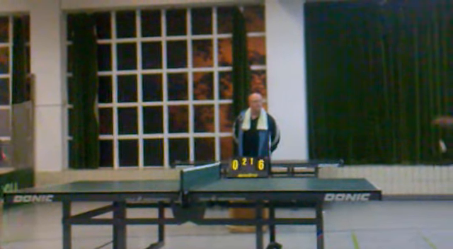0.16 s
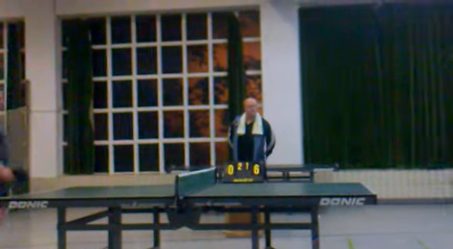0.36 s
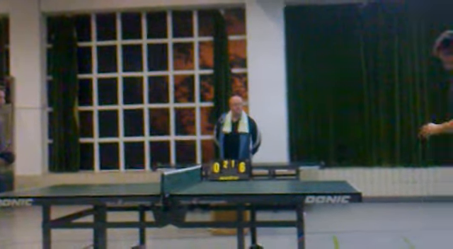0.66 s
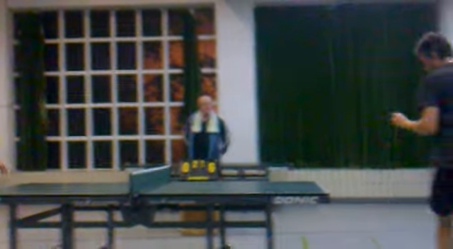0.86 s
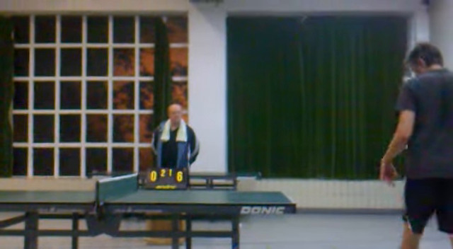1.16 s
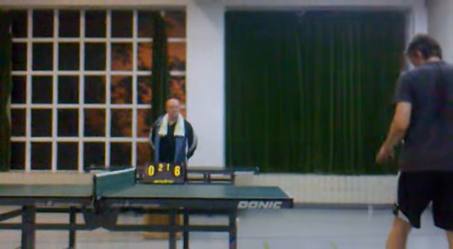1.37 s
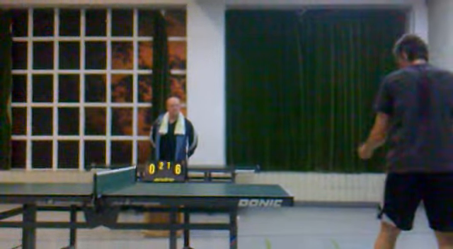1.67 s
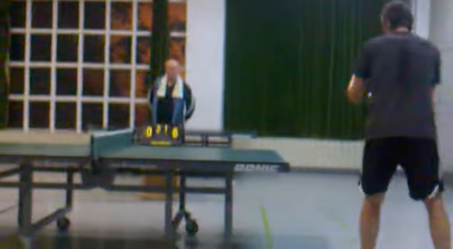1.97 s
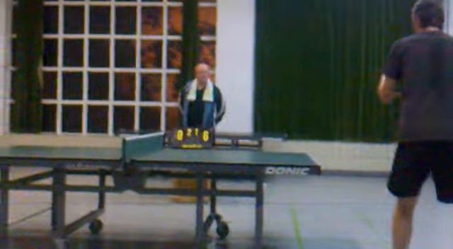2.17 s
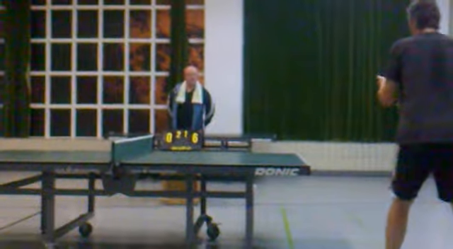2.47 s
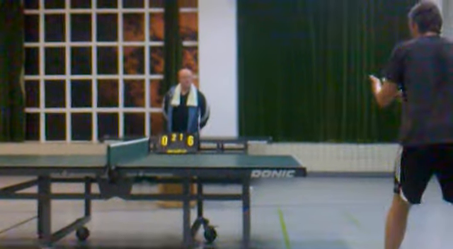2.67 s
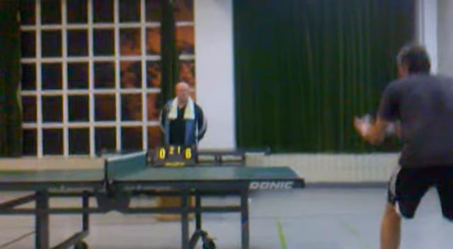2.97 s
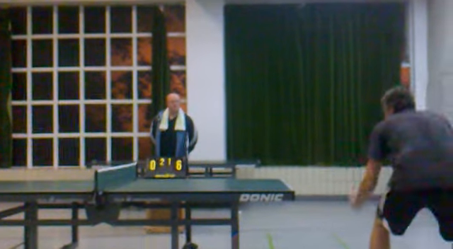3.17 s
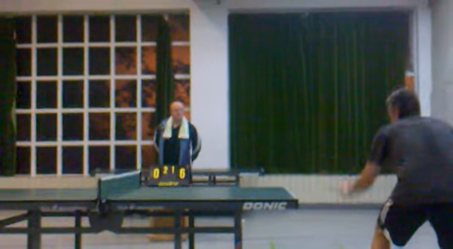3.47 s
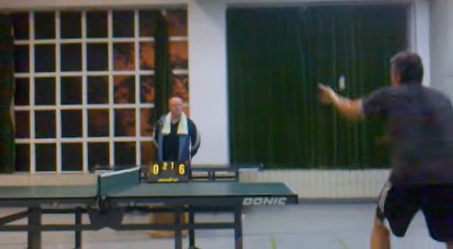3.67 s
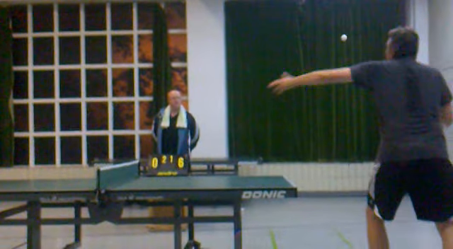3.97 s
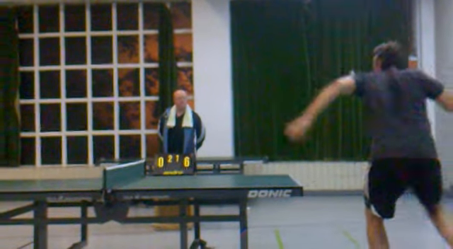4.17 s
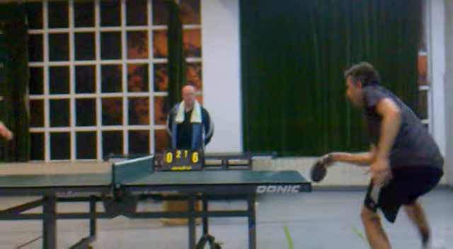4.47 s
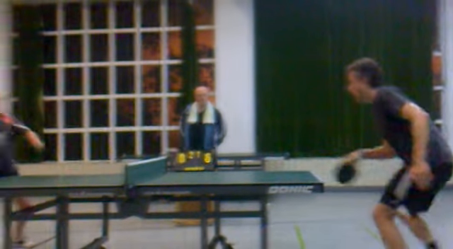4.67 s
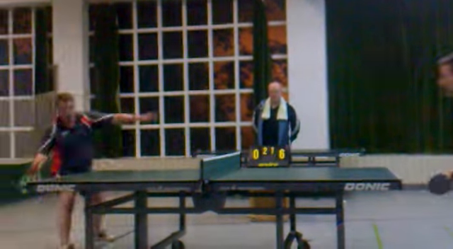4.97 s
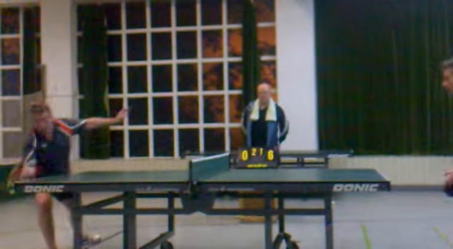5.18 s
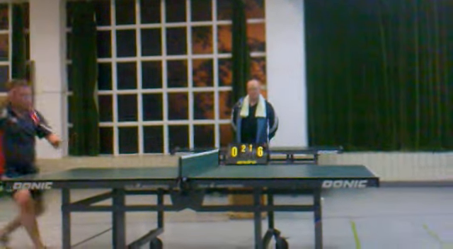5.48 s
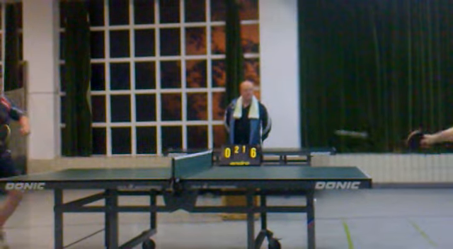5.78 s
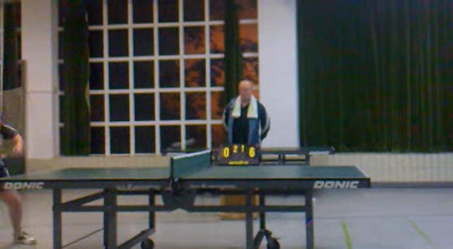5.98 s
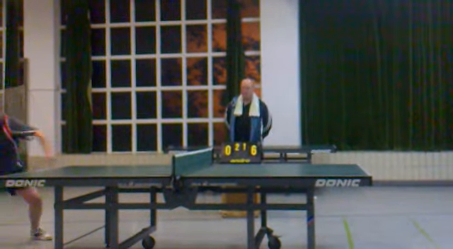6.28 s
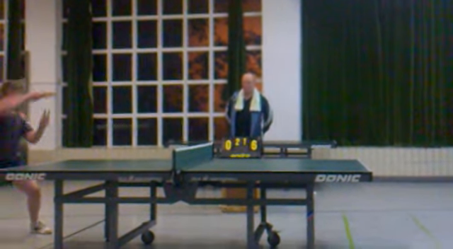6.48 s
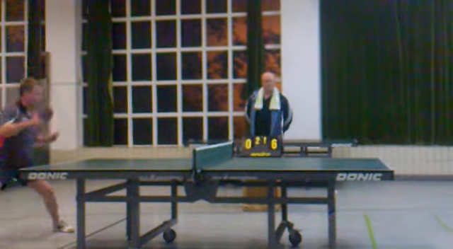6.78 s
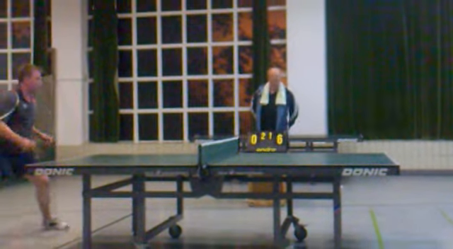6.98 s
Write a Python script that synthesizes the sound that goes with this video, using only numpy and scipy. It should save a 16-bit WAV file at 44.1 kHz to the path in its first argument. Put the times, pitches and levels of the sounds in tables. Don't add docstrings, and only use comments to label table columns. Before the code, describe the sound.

Table tennis in a reverberant gym: bright ball ticks, a pause with footsteps, then a huge floor stamp, squeaking shoes and a quick rally.

```python
import sys
import numpy as np
from scipy import signal
from scipy.fft import rfft, irfft, next_fast_len
from scipy.io import wavfile
from scipy.ndimage import uniform_filter1d, map_coordinates

SR = 44100
rng = np.random.default_rng(int(sys.argv[2]) if len(sys.argv) > 2 else 0)


def amplitude_ratio(level_db):
    exponent = np.asarray(level_db, float) / 20
    return 10 ** exponent


def file_out(sig):
    cols = np.atleast_2d(sig).T
    lim = np.clip(cols, -1, 1)
    pcm = np.round(lim * 32767).astype(np.int16)
    wavfile.write(sys.argv[1], SR, pcm)


N = 313703

# start in seconds, shell level in dB, crack in dB against the shell,
# knock in dB against the shell, hall in dB (more for far contacts).
TABLE_HITS = [(0.0601, -9.5, -6, -3.5, 1.5), (0.0712, -25, 9, 8, 2), (0.3835, -36.5, -6, -2, 8),
              (0.5559, -10.5, -0.7, 1.5, -0.5), (4.6502, -35, -18, 1, 11), (4.6558, -47.5, 12, 20, 7),
              (5.0632, -49, -2, 4, 23), (5.0698, -42, -14, 10.5, 8.5), (5.3545, -45, 3, 1.5, 10.5),
              (5.7092, -30.5, -5.5, 1, 9.5), (5.7177, -25.5, -2, 2.5, -4), (5.8634, -33.5, -4.5, 1.5, 15.5),
              (6.25, -32, -9, 5.5, 8.5), (6.2563, -40, 6.5, 15.5, 5), (6.5689, -15.5, -1, -6, 12),
              (6.998, -16.5, -5, -1.5, 3.5)]
HARD_BOUNCE = [(1.3909, -8, -4.5, -9, 3.2)]
BAT_HITS = [(.3955, -36, -6, 7.2, -6), (2.759, -58.5, -5, 10, -10), (4.5167, -48, -1.5, 8.3, 7.5),
            (4.537, -46, 4, 12, -10.5)]
# pitch in Hz, level in dB, time to fade by 60 dB in seconds.
SHELL_TONES = [(5640, -9, 0.005), (7060, -11, 0.0047), (8780, -2, 0.0046), (10350, -4, 0.003),
               (12170, -3.5, 0.003), (14200, -13.5, 0.003)]
# pitch in Hz, level in dB, 60 dB fade in seconds.
HARD_SHELL_TONES = [(5980, -18, 0.0037), (8500, -3.5, 0.0014), (9930, -8.5, 0.0075), (11140, -12, 0.00282),
                    (13300, -6, 0.00206)]
# pitch in Hz, level in dB, 60 dB fade in seconds.
CRACK_TONES = [(3350, 9.5, 0.0029), (4470, 1.5, 0.0046), (2700, 1.5, 0.003)]
# pitch in Hz, level in dB, 60 dB fade in seconds.
TABLE_TONES = [(779, -0.5, 0.0053), (1220, -0.5, 0.0058), (1530, 0, 0.0076), (1880, 3, 0.0038),
               (2285, -6, 0.006)]
# pitch in Hz, level in dB, 60 dB fade in seconds.
BLADE_TONES = [(1000, 7.5, 0.01), (1120, 1.5, .022), (1500, -5, 0.012), (1900, -11.5, .006)]
# pitch in Hz, level in dB, 60 dB fade in seconds.
PUSH_TONES = [(270, -1.5, 0.013), (413.5, -3.5, 0.016)]
# delay in seconds, level in dB.
SLAT_ECHOES = [(.0112, 5), (.0135, 1), (.0335, 3), (.0565, -1), (.0625, -5), (.079, -7)]

# start in seconds, thud level in dB, board pitch in Hz, slap in dB against the thud.
WALK_STEPS = [(0.597, -35, 77.5, -5), (0.922, -46, 94.2, 6), (1.198, -58, 70.4, -13.5),
              (1.331, -37, 125, -5.5), (1.393, -28, 113, 14.5), (1.744, -34.5, 100, -3),
              (2.418, -47.5, 53.4, -14), (2.965, -52, 109, -19), (3.168, -19.5, 44, -28),
              (3.18, -18, 76.2, -17), (3.333, -17, 114.3, -22), (3.389, -25, 130, -12.5),
              (3.499, -19.5, 118.8, -22), (3.579, -22, 104.5, -18), (3.699, -34.5, 108, -12),
              (3.798, -41, 42.8, -5), (3.912, -41.5, 53.6, -22), (4.309, -30, 86.7, -8.5)]
RALLY_STEPS = [(4.939, -47, 81.7, -16), (5.082, -21, 120, -19.5), (5.25, -31.5, 70, -7),
               (5.38, -35.5, 135, -4), (5.5, -34, 120, -8), (5.6, -33, 90, -19), (5.668, -27, 52.3, -13),
               (5.876, -16, 88, -8), (5.9, -22.5, 108.6, -11.5), (5.999, -19.5, 97.7, 0.5),
               (6.079, -20, 56.3, -4), (6.279, -28.5, 57.8, -33), (6.399, -28.5, 95, -2),
               (6.468, -24, 52, -2), (6.506, -13.5, 55.8, -12), (6.577, -27, 83, 9),
               (6.756, -15.5, 90.3, -5.5), (6.838, -29.5, 97.5, 6), (7.001, -35.5, 79, 16.5)]
HEAVY_STAMPS = [(1.906, 3, 186.4, -8), (1.915, 5.5, 78.5, -16.5), (1.932, 3.5, 138, -22),
                (4.678, -4, 177, -6), (4.689, 10.5, 105.1, -29), (4.716, 3.5, 83.3, -33)]
# frequency in Hz, level in dB.
FLOOR_BOOM = [(25, -11), (45, 0.5), (80, 2), (150, -8), (230, -13), (400, -27.5), (1000, -70.5)]
# frequency in Hz, level in dB.
BOARD_RATTLE = [(30, -13.5), (60, -5), (130, -5), (300, -2.5), (500, -10.5), (900, -17), (3000, -62.5)]
# frequency in Hz, level in dB.
SOLE_SLAP = [(150, 2.5), (400, 0), (1000, 5), (2000, 1), (2600, -3.5), (4500, -0.5), (7000, -14.5),
             (13000, -36.5)]

# start in seconds, level in dB, centre in Hz, width in Hz, length in seconds.
RUBS = [(.93, -68, 6560, 6000, 0.065), (1.084, -60, 4900, 5000, 0.0038), (1.126, -62, 3860, 2980, 0.0264),
        (2.637, -65.5, 4320, 1990, 0.042), (3.035, -70.5, 4310, 1510, 0.013),
        (3.182, -65, 3300, 4970, 0.11), (3.795, -68, 4000, 2990, 0.081), (4.328, -71.5, 3660, 4200, 0.14),
        (5.185, -66.5, 5870, 4090, 0.019), (5.39, -42, 499, 500, 0.0088),
        (5.459, -58.5, 3500, 5000, 0.0094), (5.47, -77, 7000, 5000, 0.0027),
        (5.91, -39.5, 4200, 2500, 0.0031), (6.384, -53.5, 5100, 3030, 0.024),
        (6.929, -53, 4970, 1800, 0.037), (5.449, -61, 467, 890, 0.25), (0.045, -58, 69.2, 80, 0.2)]
HEEL_TOE_SNAPS = [(0.934, -55, 320, 200, 0.0187), (1.9081, -30.5, 4280, 3010, .014),
                  (1.909, -28.5, 1795, 1500, 0.016), (4.679, -21.5, 2580, 3400, 0.0067),
                  (4.684, -26.5, 1200, 2000, .02), (5.6005, -50.5, 5500, 5000, .003),
                  (6.39, -40.5, 278, 150, 0.021), (6.529, -45, 380, 150, 0.016),
                  (7.005, -40.5, 378, 145.4, 0.019)]

# time in seconds, pitch in Hz, level in dB.
FIRST_TURN = [(4.713, 4010, -24), (4.717, 3745, -11), (4.745, 3565, -12), (4.766, 3642, -12.5),
              (4.779, 3630, -15.5), (4.786, 3600, -36)]
# time in seconds, pitch in Hz, level in dB.
FIRST_TURN_RIB = [(4.719, 6010, -47.5), (4.748, 6020, -39.5), (4.78, 6130, -42), (4.79, 6000, -54.5)]
# time in seconds, pitch in Hz, level in dB.
SECOND_TURN = [(5.95, 4760, -39), (5.963, 4540, -20.5), (5.978, 4500, -21), (5.993, 4512, -16),
               (6.012, 4700, -21), (6.032, 4500, -28)]
# time in seconds, pitch in Hz, level in dB.
SECOND_TURN_RIB = [(5.948, 5970, -41), (5.964, 5983, -33.5), (5.993, 5895, -29.5), (6.001, 5760, -46)]
# multiple of the pitch, level in dB.
SQUEAK_OVERTONES = [(1, 2.5), (2, -14.5), (3, -26), (4, -44)]
# start in seconds, pitch in Hz, level in dB, length in seconds.
DISTANT_SQUEAKS = [(3.362, 3350, -75, 0.22), (3.399, 2876, -82, 0.27), (3.944, 2120, -85, 0.17),
                   (4.049, 1534, -82, 0.073)]

# delay in seconds, level in dB.
FIRST_ECHOES = [(.004, -9.5), (0.0109, -4), (.016, -10), (0.0244, -10), (.033, -12.5), (.043, -15),
                (.056, -17.5)]
# frequency in Hz, 60 dB fade in seconds.
HALL_FADE = [(60, 0.74), (250, 0.74), (1000, 0.77), (3000, 0.67), (6000, 0.7), (10000, 0.4), (15000, 0.6)]
# frequency in Hz, level in dB.
HALL_TONE = [(60, 3.5), (500, 1.5), (1500, 2), (4000, 1.5), (9000, -5), (15000, -8)]
# frequency in Hz, level in dB per Hz.
AIR_TONE = [(15, -20.5), (25, 12), (87, 6), (427, -11.5), (1130, -13.5), (1700, -14.5), (3000, -16),
            (16000, -32.5)]


def along(points, hz):
    f, v = np.transpose(points)
    return np.interp(np.log(hz + 1), np.log(f + 1), v)


def unit(x):
    return x / np.sqrt(np.mean(x ** 2) + 1e-20)


def peak(x):
    return x / np.max(np.abs(x))


def filtered(x, response):
    m = next_fast_len(len(x) + 8192)
    return irfft(rfft(x, m) * response(np.fft.rfftfreq(m, 1 / SR)), m)[:len(x)]


def coloured_noise(length, curve):
    return unit(filtered(rng.standard_normal(length), lambda f: amplitude_ratio(along(curve, f))))


def resonance(hz, width_hz):
    return lambda f: 1j * f * width_hz / (hz * hz - f * f + 1j * f * width_hz)


def ring(modes, t):
    chance_db = 0.65 * rng.standard_normal(len(modes))
    total = np.zeros(len(t))
    for k, (hz, db, t60) in enumerate(modes):
        fade = amplitude_ratio(db + chance_db[k] - 60 * t / t60)
        total += (-1) ** k * fade * np.sin(2 * np.pi * hz * t)
    contact = 1 - np.exp(-t / 0.00022)
    return peak(total * contact)


def hall_tail():
    hz, t, z = signal.stft(rng.standard_normal(3 * SR // 4), SR, nperseg=512)
    fade_db = along(HALL_TONE, hz)[:, None] - 60 * t / along(HALL_FADE, hz)[:, None]
    tail = signal.istft(z * amplitude_ratio(fade_db), SR, nperseg=512)[1]
    build_up = 1 - np.exp(-np.arange(len(tail)) / SR / 0.005)
    return tail * build_up / np.linalg.norm(tail)


def add(out, s, sound, hall_db, near_db=0):
    path = amplitude_ratio(hall_db - near_db) * hall_tail()
    path[0] = 1
    i = np.arange(400)
    for delay, db in FIRST_ECHOES:
        scatter = rng.standard_normal(400) * np.exp(-i / (6 + 0.05 * delay * SR))
        path[round(delay * SR):][:400] += amplitude_ratio(db - 0.5 - near_db) * scatter / np.linalg.norm(scatter)
    heard = signal.fftconvolve(sound, path)[:N - round(s * SR)]
    out[round(s * SR):][:len(heard)] += heard


def hit(out, row, shell, wood, push_db, slats=()):
    s, db, crack_db, knock_db, hall_db = row
    t = np.arange(SR // 20) / SR
    crack = -amplitude_ratio(db - 5.5 + crack_db) * ring(CRACK_TONES, t)
    knock = amplitude_ratio(db + knock_db - 5) * (ring(wood, t) + amplitude_ratio(push_db) * ring(PUSH_TONES, t))
    add(out, s, amplitude_ratio(db - 1.5) * ring(shell, t) + knock + crack, hall_db)
    tick = peak(np.sin(2 * np.pi * 4800 * t) * amplitude_ratio(-60 * t / 0.0016))
    out[round(s * SR):][:len(t)] += amplitude_ratio(db - 5) * tick - 0.23 * knock
    for delay, echo_db in slats:
        out[round((s + delay) * SR):][:len(t)] += amplitude_ratio(echo_db) * crack


def ball():
    out = np.zeros(N)
    for row in TABLE_HITS:
        hit(out, row, SHELL_TONES, TABLE_TONES, push_db=-13.5)
    for row in BAT_HITS:
        hit(out, row, SHELL_TONES, BLADE_TONES, push_db=-30)
    for row in HARD_BOUNCE:
        hit(out, row, HARD_SHELL_TONES, TABLE_TONES, push_db=-11, slats=SLAT_ECHOES)
    return out


def footfall(out, row, board_t60, rattle_db, boom_share, rise_ms, near_db):
    s, db, hz, slap_db = row
    t = np.arange(SR // 4) / SR
    t60 = board_t60 * (100 / hz) * 10 ** (-0.025 * (slap_db + 12))
    rattle_db = rattle_db + 0.47 * (slap_db + 8)
    rise = 1 - np.exp(-1000 * t / rise_ms)
    cycles = np.cumsum(hz * (1 + 0.2 * np.exp(-t / 0.016))) / SR
    boom = coloured_noise(len(t), FLOOR_BOOM)
    rattle = amplitude_ratio(rattle_db - 3 - 60 * t / (1.2 * t60)) * coloured_noise(len(t), BOARD_RATTLE)
    slap = amplitude_ratio(slap_db + 2.5 - 60 * t / 0.073) * coloured_noise(len(t), SOLE_SLAP)
    thud = peak(amplitude_ratio(-60 * t / t60) * rise * (np.sin(2 * np.pi * cycles) + boom_share * boom))
    add(out, s, amplitude_ratio(db - 7) * (thud + rise ** 3 * (rattle + slap)), -6, near_db=near_db)


def steps():
    out = np.zeros(N)
    for row in WALK_STEPS:
        footfall(out, row, board_t60=0.24, rattle_db=-14.5, boom_share=0.45, rise_ms=7, near_db=-0.7)
    for row in RALLY_STEPS:
        footfall(out, row, board_t60=0.31, rattle_db=-12, boom_share=0.57, rise_ms=6, near_db=0.5)
    for row in HEAVY_STAMPS:
        footfall(out, row, board_t60=0.11, rattle_db=-4.5, boom_share=0.5, rise_ms=1.5, near_db=9.5)
    return out


def scuffs():
    out = np.zeros(N)
    for s, db, hz, width_hz, length in [*RUBS, *HEEL_TOE_SNAPS]:
        stroke = signal.windows.tukey(round(length * SR), 0.3)
        band = resonance(hz, width_hz)
        puff = unit(filtered(rng.standard_normal(SR // 4), lambda f: band(f) ** 2))
        add(out, s, amplitude_ratio(db) * stroke * puff[:len(stroke)], -3)
    return out


def squeal(rows, jitter, flutter_db, edge_db, rasp_db):
    s, hz, db = np.transpose(rows)
    t = np.arange(s[0], s[-1], 1 / SR)
    pitch_waver, grip_waver = [
        unit(uniform_filter1d(uniform_filter1d(v, size=50), size=50))[:len(t)]
        for v in rng.standard_normal((2, SR // 2))]
    phase = 2 * np.pi * np.cumsum(np.interp(t, s, hz) * (1 + jitter * pitch_waver)) / SR
    tone = np.zeros(len(t))
    for k, level in SQUEAK_OVERTONES:
        if k * hz[0] < SR / 2:
            tone += amplitude_ratio(level + edge_db * (k > 1)) * np.sin(k * phase)
    rasp = amplitude_ratio(rasp_db) * unit(filtered(rng.standard_normal(SR // 2), resonance(hz[1], 1400)))[:len(t)]
    grip = signal.windows.tukey(len(t), 0.1) * amplitude_ratio(np.interp(t, s, db) + flutter_db * grip_waver)
    return grip * (tone + rasp)


def squeaks():
    out = np.zeros(N)
    first = squeal(FIRST_TURN, jitter=0.028, flutter_db=3, edge_db=0.5, rasp_db=-20)
    add(out, FIRST_TURN[0][0], first, -4)
    first_rib = squeal(FIRST_TURN_RIB, jitter=0.009, flutter_db=5.5, edge_db=-19.5, rasp_db=-40)
    add(out, FIRST_TURN_RIB[0][0], first_rib, -1.5)
    second = squeal(SECOND_TURN, jitter=0.019, flutter_db=1, edge_db=-14.5, rasp_db=-27.5)
    add(out, SECOND_TURN[0][0], second, -1.5)
    second_rib = squeal(SECOND_TURN_RIB, jitter=0.0061, flutter_db=5, edge_db=-28, rasp_db=-21)
    add(out, SECOND_TURN_RIB[0][0], second_rib, -1.5)
    for s, hz, db, length in DISTANT_SQUEAKS:
        swell = [(0, hz, db - 8), (0.05, hz, db), (length, hz, db - 5)]
        add(out, s, squeal(swell, jitter=0.005, flutter_db=2.5, edge_db=-15, rasp_db=-20), 3)
    return out


def air():
    drift = map_coordinates(rng.standard_normal(60), [np.arange(N) * 7 / SR])
    return amplitude_ratio(-60 + 0.84 * drift) * coloured_noise(N, AIR_TONE)


def scene():
    return (ball() + steps() + scuffs() + squeaks() + air())[None]


def roll_off(x):
    return signal.sosfilt(signal.butter(12, 16480, fs=SR, output="sos"), x)


def record(dry):
    x = filtered(dry[0], lambda f: (1j * f / (22 + 1j * f)) ** 4)
    level = np.sqrt(np.abs(uniform_filter1d(x ** 2, size=900)))
    x = x + amplitude_ratio(-51.5) * level ** 0.36 * rng.standard_normal(N)
    x = x / (1 + np.abs(x / 0.715) ** 8) ** (1 / 8)
    x = filtered(x, lambda f: 1 / (1 + (f / 15700) ** 60))
    return roll_off(x[None])


dry = scene()
out = record(dry)
file_out(out)
```